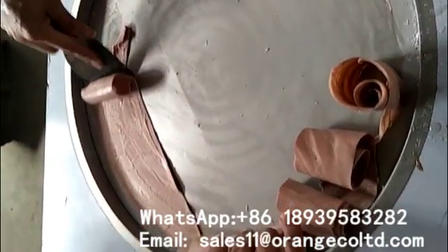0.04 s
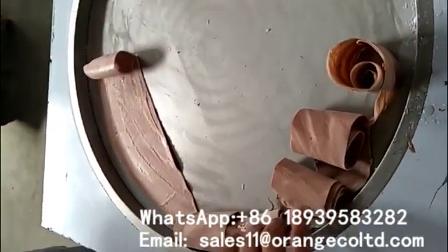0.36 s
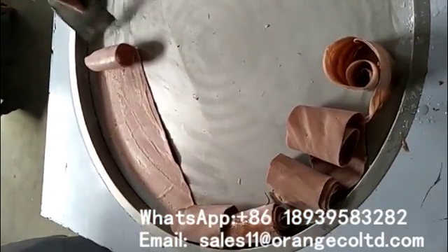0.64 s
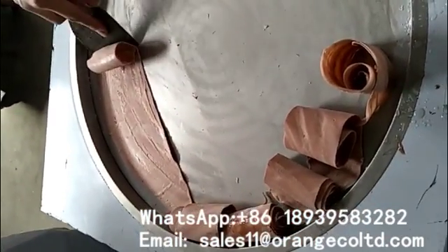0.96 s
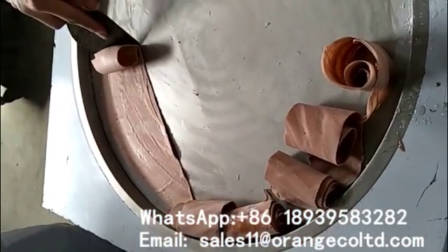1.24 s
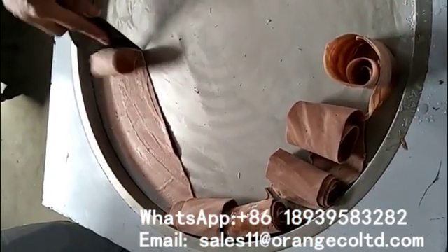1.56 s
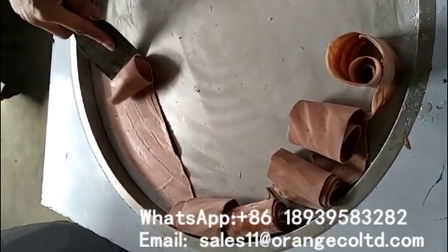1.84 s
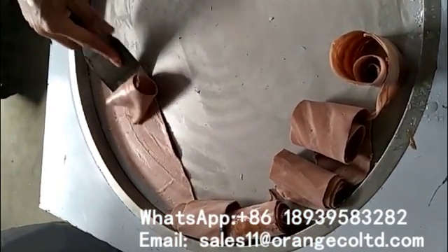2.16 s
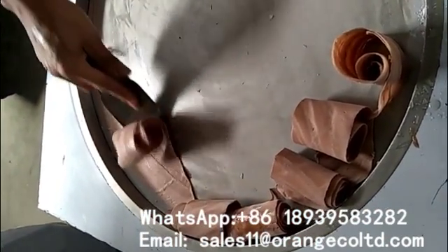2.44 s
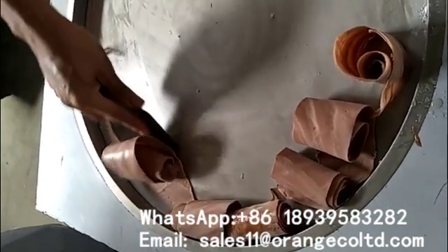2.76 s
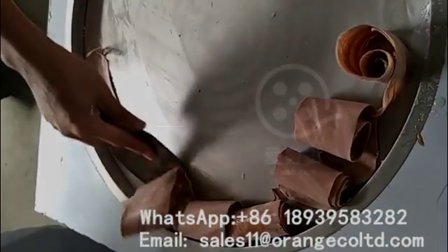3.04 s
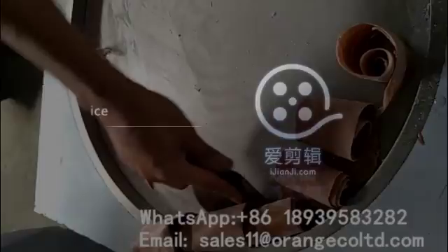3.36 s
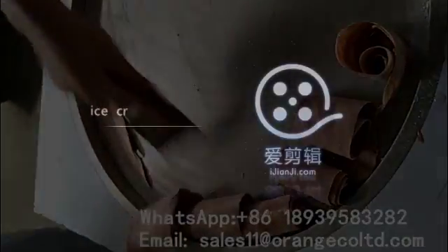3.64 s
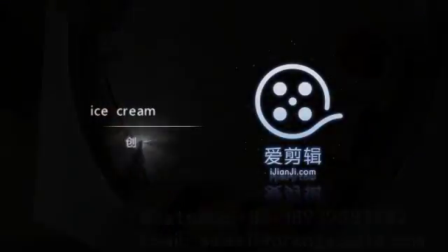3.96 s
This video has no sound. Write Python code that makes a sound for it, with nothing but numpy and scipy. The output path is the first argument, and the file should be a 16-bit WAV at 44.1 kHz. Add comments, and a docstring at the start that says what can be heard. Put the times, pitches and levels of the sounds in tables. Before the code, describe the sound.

Close up indoors, a rolled ice cream machine hums with rushing fan air and a light casing buzz. A metal blade creeps across the frozen plate, scrapes louder, clacks several times and draws back with a falling rasp.

```python
"""In a room, close to a refrigerated cold plate for rolled ice cream, on a stereo pair of microphones.
The compressor hums; the cooling fan throbs, blows air and sets the sheet-metal casing buzzing.
A steel scraper creeps hissing over the frost and pushes through to finish a roll. It knocks
against the pan in a quick cluster, then is drawn back with a sinking stick-slip rasp."""
import sys
import numpy as np
from scipy import signal
from scipy.fft import rfft, irfft
from scipy.io import wavfile

SR = 44100
rng = np.random.default_rng(int(sys.argv[2]) if len(sys.argv) > 2 else 0)


def bounce(signal):
    """Save signal as a 16-bit WAV file at the path given by the first command-line argument."""
    frames = np.transpose(np.atleast_2d(signal))
    limited = np.clip(frames, -1, 1)
    pcm = np.round(limited * 32767).astype(np.int16)
    wavfile.write(sys.argv[1], SR, pcm)


N = 176400
TIME, FREQS = np.arange(N) / SR, np.fft.rfftfreq(N, 1 / SR)


def amp(db):
    """Decibels to gain."""
    return 10 ** (np.asarray(db) / 20)

def unit(x):
    """Scales to rms 1."""
    return x / np.sqrt(np.mean(x ** 2) + 1e-20)

def read(points, hz):
    """Reads a table on a log-frequency axis."""
    freqs, values = np.transpose(points)
    return np.interp(np.log(hz + 1), np.log(freqs + 1), values)

def colour(x, points, tilt_db=0):
    """Gives a sound a spectrum, tilted per octave, at rms 1."""
    hz = np.fft.rfftfreq(x.shape[-1], 1 / SR)
    gain = amp(read(points, hz) + tilt_db * np.log2(hz + 1))
    return unit(irfft(rfft(x) * gain, x.shape[-1]))

def drift(rate_hz):
    """Slow random movement up to about a rate, at rms 1."""
    return unit(irfft(rfft(rng.standard_normal(N)) * bell(FREQS, 0, rate_hz) * (FREQS > 0), N))

def bell(x, centre, width):
    """A Gaussian hump of height 1."""
    return np.exp(-((x - centre) / width) ** 2)

def decay(t, t60):
    """Falls 60 dB in t60 seconds."""
    return np.exp(-np.log(1000) * t / t60)

def grains(per_s):
    """Sparse random clicks, of a different size in each channel."""
    return rng.standard_normal((2, N)) * (rng.random(N) < per_s / SR)

def band(x, centre_hz, width_hz):
    """A sound through one fixed resonance, at rms 1."""
    return unit(irfft(rfft(x) / (1 + 1j * (FREQS - centre_hz) / width_hz) ** 2, N))

def bumps(x, peaks):
    """Lifts or lowers narrow bands of a sound."""
    gain_db = sum(db * bell(FREQS, centre, width) for centre, width, db in peaks)
    return irfft(rfft(x) * amp(gain_db), N)

def panned(x, left_db):
    """Leans a sound to the left or right microphone."""
    return x * amp([[left_db / 2], [-left_db / 2]])

def add(mix, s, sound):
    """Mixes a sound in at a time."""
    part = mix[:, round(s * SR):][:, :sound.shape[-1]]
    part += sound[..., :part.shape[1]]


# fan tones at each microphone, before vent and swell (multiple of turning rate, left [dB], right [dB])
FAN_TONES = [(22, -57, -54), (36, -55, -51), (39, -41, -39), (40, -41, -38), (41, -57, -44), (42, -45, -49),
             (43, -52, -45), (45, -57, -48), (46, -56, -55), (48, -53, -49), (52, -54, -46), (58, -52, -44),
             (60, -56, -58), (83, -61, -58), (87, -59, -58), (96, -57, -53), (117, -52, -51),
             (118, -48, -56), (119, -58, -52), (120, -49, -45), (148, -55, -65), (150, -56, -52),
             (151, -58, -59), (153, -60, -57), (155, -56, -56), (158, -60, -53), (162, -72, -57),
             (183, -65, -57)]
# how much of the tones leaves the cabinet (frequency [Hz], gain [dB])
FAN_VENT = [(250, 7.5), (450, 1), (600, -4.5), (1300, -4.5), (1800, 6)]
# swell of the tones alone (time [s], level [dB])
FAN_SWELL = [(0, -7), (.5, -2), (1, -0.5), (1.7, 0.5), (2.5, -0.5), (4, -1)]

def fan(turn_hz=11.4757, wander=0.00042, flutter=0.23, spread_hz=900, gain_db=0.5):
    """Multiples of the turning rate beat into a throb; higher ones reach the microphones out of step."""
    turns = turn_hz * np.cumsum(1 + wander * drift(2.5)) / SR
    out = np.zeros((2, N))
    for order, left_db, right_db in FAN_TONES:
        phase = 2 * np.pi * (order * turns + rng.random())
        apart = rng.choice([-1, 1]) * min((order * turn_hz / spread_hz) ** 2, 2)
        level = amp(read(FAN_VENT, order * turn_hz)) * (1 + flutter * drift(6.9))
        out += level * np.array([amp(left_db) * np.sin(phase), amp(right_db) * np.sin(phase + apart)])
    return np.sqrt(2) * amp(gain_db + np.interp(TIME, *np.transpose(FAN_SWELL))) * out


# likeness of room noise at the two microphones (frequency [Hz], correlation)
PAIR_LIKENESS = [(60, .99), (150, .975), (300, .83), (600, .48), (1200, .05), (2500, 0)]
# its balance across the pair (frequency [Hz], left minus right [dB])
PAIR_BALANCE = [(60, -3.5), (150, 0), (380, -4.5), (950, -3), (1900, -2), (2600, 0), (4500, 2.5),
                (6500, -1.5), (9000, -26), (15000, 7.5)]

def diffuse():
    """Noise as the pair hears it in the room: alike in the bass, unrelated in the treble."""
    shared, separate = rfft(rng.standard_normal((2, N)))
    same, lean = np.clip(read(PAIR_LIKENESS, FREQS), -1, 1), amp(read(PAIR_BALANCE, FREQS) / 2)
    right = same * shared + np.sqrt(1 - same ** 2) * separate
    return irfft(np.array([shared * lean, right / lean]), N)


# rush of air beside the machine (frequency [Hz], relative density [dB])
AIR_SPECTRUM = [(20, -20.5), (35, -16.5), (52, -8.5), (75, 1.5), (120, 1), (190, -0.5), (250, -3.5),
                (310, -5.5), (400, -3), (490, -5.5), (600, -6.5), (800, -11.5), (1300, -10.5),
                (2100, -13.5), (3200, -16.5), (3700, -22.5), (4050, -21.5), (4750, -26.5), (5250, -31),
                (5900, -29.5), (7200, -41), (8500, -64.5), (10500, -83), (16000, -82)]

def air(level_db=-30, flicker_db=0.82):
    """Air rushes through the condenser."""
    return amp(level_db + flicker_db * drift(25)) * colour(diffuse(), AIR_SPECTRUM)


# resonances of the casing (frequency [Hz], width [Hz], level [dB])
CASING_MODES = [(1760, 50, -49), (1930, 90, -53), (2085, 83, -61)]

def casing(turn_hz=11.4757, peak_s=0.046, sharpness=0.8):
    """Sheet metal buzzes on every turn of the fan."""
    push = abs(np.cos(np.pi * turn_hz * (TIME - peak_s))) ** sharpness
    drive = diffuse() * push
    return sum(amp(db) * band(drive, hz, width) for hz, width, db in CASING_MODES)


# compressor, mains and cabinet hum (frequency [Hz], level [dB])
HUM_TONES = [(41.9, -51.5), (58.08, -34.5), (78.1, -56.5), (100.0, -46.5), (116.2, -45.5), (158.1, -48),
             (174.2, -42.5), (180.0, -47), (208.2, -52), (232.3, -48)]

def compressor(flutter=0.11, left_lead_rad=0.049):
    """The compressor hums in low, slightly fluttering tones, almost the same at both microphones."""
    lead, out = np.array([[left_lead_rad], [0]]), np.zeros((2, N))
    for hz, db in HUM_TONES:
        level = amp(db) * (1 + flutter * drift(21))
        out += level * np.sin(2 * np.pi * (hz * TIME + rng.random()) + lead)
    return np.sqrt(2) * out


# swells of thin, gritty sizzle (time [s], width [s], level [dB])
SIZZLES = [(.32, .03, -64), (3.23, 0.048, -52.5)]
# their spectrum (frequency [Hz], relative density [dB])
SIZZLE_SPECTRUM = [(500, -29), (3000, -5), (7000, 1.5), (10500, -4), (12000, -18), (14800, 13), (16000, -4)]

def sizzles(grains_per_s=9100):
    """A very faint, brief high sizzle near the start; a stronger one at 3.23 s as the edge skids."""
    swells = sum(amp(db) * bell(TIME, s, width) for s, width, db in SIZZLES)
    return swells * colour(grains(grains_per_s), SIZZLE_SPECTRUM)


# strokes over the plate (start [s], length [s], rise [s], fall [s], level [dB], tilt [dB/octave])
STROKES = [(.68, 6.1, 0.022, .05, -40.5, -2.5), (2.674, 0.6, 0.14, 0.34, -30, -1),
           (3.207, 0.14, 0.011, 0.009, -30, -3.5), (3.652, 0.41, .18, 0.13, -28, 1)]
# steel sliding on frost (frequency [Hz], relative density [dB])
SCRAPE_SPECTRUM = [(100, -25.5), (300, 4), (600, 1), (1000, 3.5), (1600, -2), (2400, 0.5), (3500, -3),
                   (5000, -11), (6500, -15.5), (8000, -31), (10500, -59.5), (16000, -62.5)]
# resonances of blade and plate under the sliding edge (frequency [Hz], width [Hz], gain [dB])
SCRAPE_PEAKS = [(1240, 46, 4.5), (1770, 60, 5), (2120, 63, 5), (2450, 73, -1.5), (2850, 20, 9),
                (3495, 60, 3.5), (3820, 35, 7), (5630, 200, 3.5)]

def scraper(cracks_per_s=900, crack_gain=0.25, judder_db=0.45):
    """Steel slides over the frozen plate: a hiss with tiny cracks of frost."""
    out = np.zeros((2, N))
    for start, length, rise, fall, db, tilt_db in STROKES:
        shape = np.clip((TIME - start) / rise, 0, 1) * np.clip((start + length - TIME) / fall, 0, 1)
        cracks = crack_gain * unit(grains(cracks_per_s))
        level = amp(db + judder_db * drift(50))
        out += shape * level * colour(diffuse() + cracks, SCRAPE_SPECTRUM, tilt_db)
    return panned(bumps(out, SCRAPE_PEAKS), left_db=1)


# rumbles of the pan under the hand (time [s], width [s], level [dB], frequency [Hz])
RUMBLES = [(2.4, 0.25, -35, 112), (3.41, 0.052, -29.5, 190), (3.87, 0.032, -25.5, 148)]

def rumbles(width_hz=34):
    """The pan rumbles softly as the hand shifts the blade."""
    rub = diffuse()
    return sum(amp(db) * bell(TIME, s, width) * band(rub, hz, width_hz) for s, width, db, hz in RUMBLES)


def ringing(modes, t):
    """Dying partials of something struck; neighbouring modes swing in opposite directions."""
    return sum((-1) ** k * amp(db) * decay(t, t60) * np.sin(2 * np.pi * hz * t)
               for k, (hz, db, t60) in enumerate(modes))

# knocks (time [s], pan thud gain [dB], blade clack gain [dB], edge tick gain [dB], pan pitch ratio)
KNOCKS = [(3.172, -47, -32, -27, .96), (3.1853, -25, -21, -20, .96), (3.1885, -12.5, -27, -25, .96),
          (3.2465, -21, -36, -36, .96), (3.2599, -19.5, -13, -17, 1), (3.2648, -21, -22, -22, 1),
          (3.2864, -11.5, -4.5, -23, 1), (3.2904, -16, -14.5, -23.5, 1), (3.3066, -28, -22, -23, 1)]
# modes of the pan, and of the blade pressed on it (frequency [Hz], relative level [dB], t60 [s])
PAN_MODES = [(165, -15, .07), (247.5, 1, 0.145), (335, -4.5, 0.055), (450, -10, 0.071)]
BLADE_MODES = [(400, 1, 0.022), (590, -3, 0.025), (764, -3, 0.04), (990, 1, 0.031), (1190, -8, 0.035),
               (1495, -7, 0.028), (2019, -17, .11), (2170, -22, 0.06), (2430, -28, .1)]
# noise of the clack and of the tick (frequency [Hz], relative density [dB])
CLACK_SPECTRUM = [(50, -36), (150, -16), (350, 16), (720, 11), (1000, 8), (1500, -9), (2300, -11),
                  (4000, -32), (9000, -54), (16000, -75)]
TICK_SPECTRUM = [(200, -13), (1200, 4.5), (2600, 7), (4000, 2), (5200, -4.5), (7200, -8.5), (9500, -24),
                 (12500, -29), (14500, -12), (16000, -9)]

def knocks(rise_s=0.0008, grit_db=-7, low_cut_hz=116):
    """The blade hits the pan: the edge ticks, the blade clacks right of centre, the damped pan rings."""
    t, out = np.arange(SR // 4) / SR, np.zeros((2, N))
    rise = np.minimum(t / rise_s, 1)
    for s, thud_db, clack_db, tick_db, pitch in KNOCKS:
        grit = colour(rng.standard_normal((2, len(t))), CLACK_SPECTRUM) * decay(t, t60=0.025)
        tick = colour(rng.standard_normal((2, len(t))), TICK_SPECTRUM) * decay(t, t60=0.031)
        clack = ringing(BLADE_MODES, t) / 2 + amp(grit_db) * grit
        thud = ringing(PAN_MODES, pitch * t)
        add(out, s, rise * panned(amp(thud_db) * thud + amp(tick_db) * tick, left_db=1))
        add(out, s, rise * panned(amp(clack_db) * clack, left_db=-5.5))
    # the knocks carry little bass
    return signal.lfilter(*signal.butter(2, low_cut_hz, "highpass", fs=SR), out)


def room(x, t60=0.25, gain_db=-14, delay_s=0.0096, dull_hz=5000):
    """The room returns a short, dull tail of sparse reflections to the microphones."""
    t = np.arange(SR // 2) / SR
    taps = rng.standard_normal((2, len(t))) * (rng.random((2, len(t))) < 0.1)
    taps *= (t > delay_s) * decay(t, t60)
    tail = signal.lfilter(*signal.butter(2, dull_hz, fs=SR), taps / np.linalg.norm(taps[0]))
    return amp(gain_db) * signal.fftconvolve(x, tail, axes=1)[:, :N]


def resonate(x, hz, width_hz):
    """A resonance that follows a moving frequency."""
    carrier, r = np.exp(2j * np.pi * np.cumsum(hz) / SR), np.exp(-np.pi * width_hz / SR)
    return (carrier * signal.lfilter([(1 - r) ** 2], [1, -2 * r, r * r], x / carrier + 1e-18)).real

# the blade drawn back, right of centre (time [s], pitch [Hz], level [dB])
RASP_PATH = [(3.72, 2930, -42), (3.8, 2450, -42), (3.85, 2150, -40), (3.92, 1950, -42.5), (4, 1930, -40)]
# its bending modes (multiple of the pitch, width [Hz], gain [dB])
RASP_MODES = [(1, 240, 5.5), (1.6, 380, -3.5)]

def rasp(slips_per_s=700, spread_db=4, rise_s=0.03):
    """The edge sticks and slips unevenly and rings the blade, whose pitch sinks as it unbends."""
    times, pitch, level_db = np.transpose(RASP_PATH)
    slips = amp(spread_db * rng.standard_normal(N)) * (rng.random(N) < slips_per_s / SR)
    drive = slips * rng.standard_normal((2, N))
    hz = np.interp(TIME, times, pitch)
    ring = sum(amp(db) * unit(resonate(drive, ratio * hz, width)) for ratio, width, db in RASP_MODES)
    shape = amp(np.interp(TIME, times, level_db)) * np.clip((TIME - times[0]) / rise_s, 0, 1)
    return panned(shape * ring, left_db=-3.5)


# fan, air and casing together at the microphones (time [s], level [dB])
COOLING_LEVEL = [(0, 0.5), (.3, -1), (.8, 0), (2.4, -0.3), (3.5, 0), (4, 0)]

def scene():
    """The running machine with the scraper at work on top; the knocks echo in the room."""
    cooling = (fan() + air() + casing()) * amp(np.interp(TIME, *np.transpose(COOLING_LEVEL)))
    machine = cooling + compressor()
    hits = knocks()
    return machine + scraper() + rasp() + sizzles() + rumbles() + hits + room(hits)


# narrow dips of the microphone ports (frequency [Hz], width [Hz], gain [dB])
PORT_DIPS = [(4520, 35, -3), (4705, 38, -10), (4900, 42, -6.5), (6490, 45, -4)]

def record(dry):
    """The colour of the microphone ports, then the recorder's band limit."""
    band_limit = signal.firwin(511, cutoff=15900, window=("kaiser", 9), fs=SR)
    return signal.oaconvolve(bumps(dry, PORT_DIPS), band_limit[None], "same")


dry = scene()
out = record(dry)
bounce(out)
```